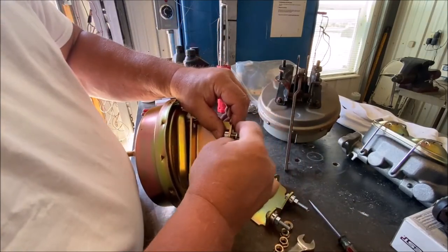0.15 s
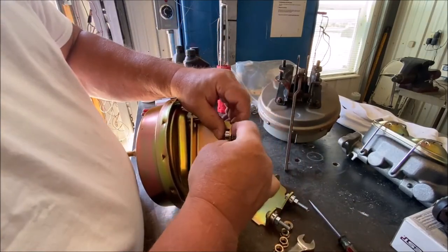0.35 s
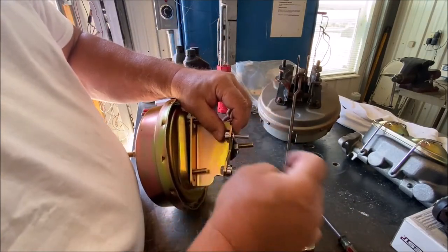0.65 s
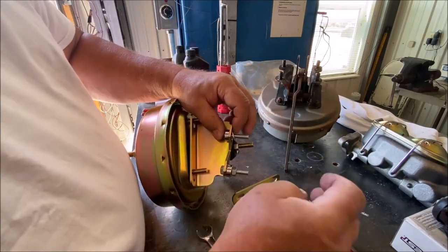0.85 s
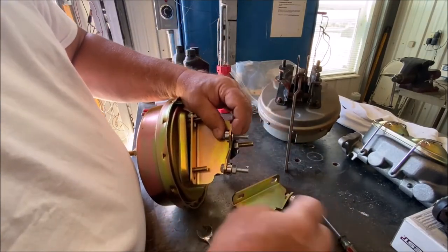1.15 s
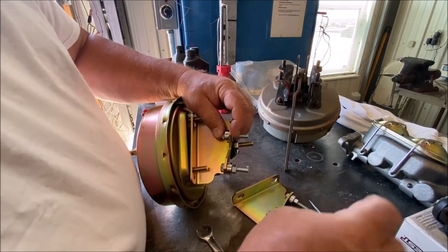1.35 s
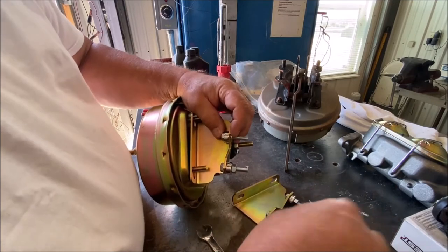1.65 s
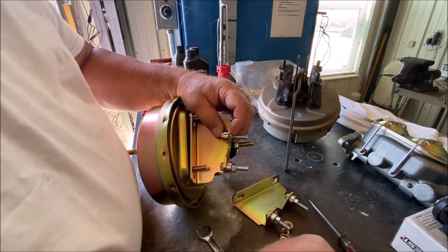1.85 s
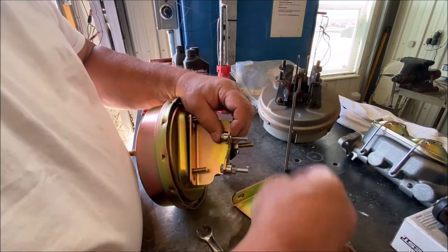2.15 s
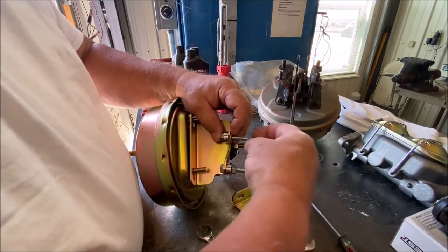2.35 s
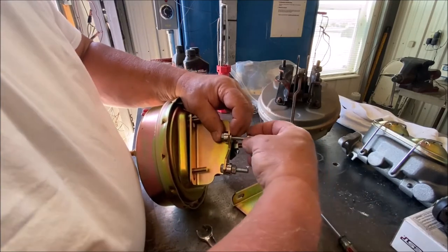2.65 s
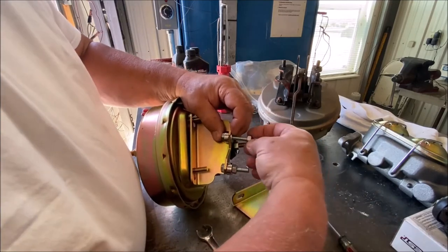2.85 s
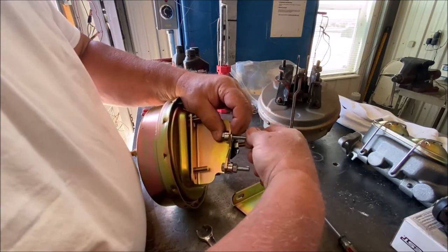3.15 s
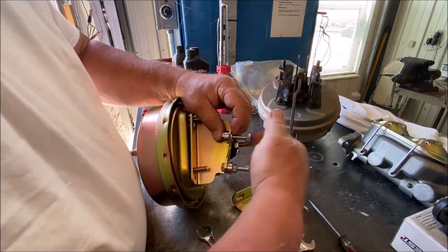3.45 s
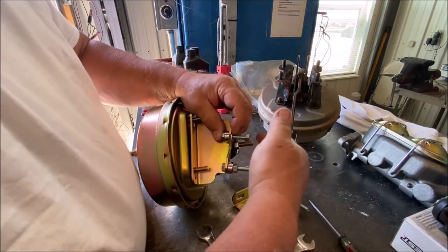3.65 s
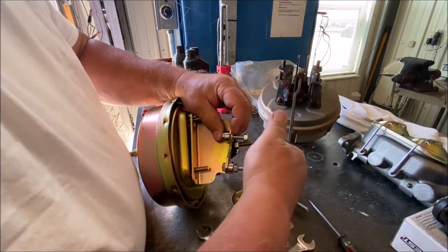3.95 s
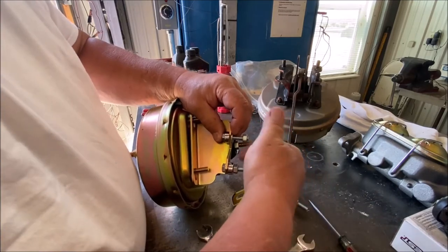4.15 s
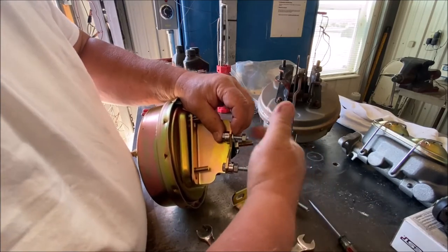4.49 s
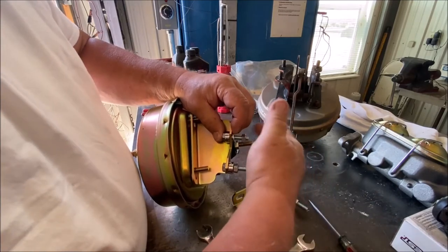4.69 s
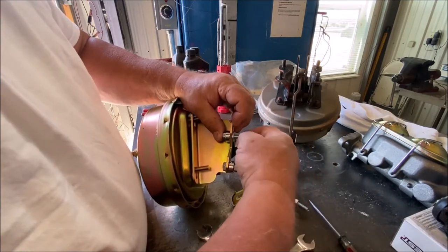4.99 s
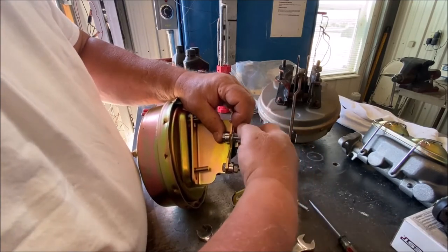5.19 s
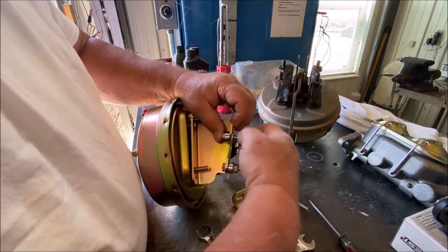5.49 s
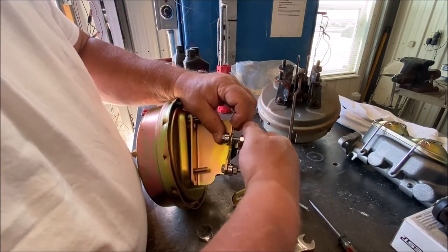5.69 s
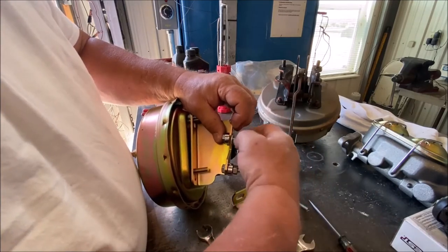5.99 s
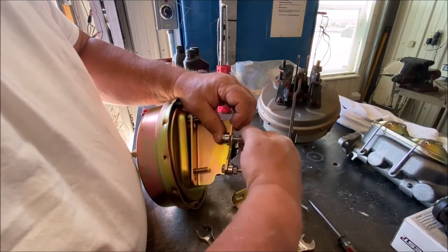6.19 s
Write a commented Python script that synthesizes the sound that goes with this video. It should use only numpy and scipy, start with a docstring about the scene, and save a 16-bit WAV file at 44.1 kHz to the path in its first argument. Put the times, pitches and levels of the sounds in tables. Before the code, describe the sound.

Light, irregular metal clicks and short thread scrapes, with a few soft bench thumps and a steady low hum.

```python
"""Fingers rustle and small steel spacers and nuts click as they are picked up and spun onto studs.
Each contact is a short crack that rings the parts; threads stick and slip; knuckles thump the bench.
A small workshop room answers, over mains hum, a slower motor's drone and low rumble."""
import sys
import numpy as np
from scipy import signal
from scipy.fft import rfft, irfft, next_fast_len
from scipy.io import wavfile
from scipy.ndimage import uniform_filter1d

SR = 44100
rng = np.random.default_rng(int(sys.argv[2]) if len(sys.argv) > 2 else 0)


def store_wav(level_fs):
    """Save 16-bit WAV to argv[1]."""
    pcm = np.round(np.clip(np.atleast_2d(level_fs), -1, 1) * 32767)
    wavfile.write(sys.argv[1], SR, pcm.T.astype(np.int16))


N = 279153
TIME_S = np.arange(N) / SR


def undb(db):
    """Decibels to gain."""
    return 10 ** (np.asarray(db) / 20)


def unit(x):
    """Scale to rms 1."""
    return x / np.sqrt(np.mean(x ** 2))


def pan(left_over_right_db):
    """Stereo gain column."""
    return undb([[left_over_right_db / 2], [-left_over_right_db / 2]])


def contour(table):
    """Gain over time from (time_s, level_db) points."""
    return undb(np.interp(TIME_S, *np.transpose(table)))


def on_log(hz, table):
    """Interpolate (freq_hz, value) points on a log axis."""
    at_hz, value = np.transpose(table)
    return np.interp(np.log(np.maximum(hz, 1)), np.log(np.maximum(at_hz, 1)), value)


def noise(table):
    """Noise coloured by (freq_hz, density_db) points."""
    size = next_fast_len(N)
    colour = undb(on_log(np.fft.rfftfreq(size, 1 / SR), table))
    return irfft(rfft(rng.standard_normal(size)) * colour, size)[:N]


def band(x, lo_hz, hi_hz, order=2):
    """Butterworth band-pass."""
    sos = signal.butter(order, [lo_hz, min(hi_hz, .45 * SR)], "band", fs=SR, output="sos")
    return signal.sosfilt(sos, x)


def walk(rate_hz):
    """Random steps, smoothed twice; spread near 1."""
    hold = int(SR / rate_hz)
    steps = np.repeat(rng.standard_normal(N // hold + 1), hold)
    return 1.4 * uniform_filter1d(uniform_filter1d(steps, hold), hold)[:N]


def ring(x, modes, wander_db=0.):
    """Damped modes driven by x; each drive wanders as the grip changes."""
    out = 0
    for hz, db, t60_s in modes:
        radius, angle = np.exp(-np.log(1000) / (t60_s * SR)), 2 * np.pi * hz / SR
        drive = x * undb(db + wander_db * walk(rate_hz=11))
        out = out + signal.lfilter([0, np.sin(angle)], [1, -2 * radius * np.cos(angle), radius ** 2], drive)
    return out


def blows(starts_s, levels_db, lengths_s):
    """Contact envelopes: fast swell, exponential decay."""
    out = np.zeros(N)
    for start_s, level_db, length_s in zip(starts_s, levels_db, lengths_s):
        i = int(max(start_s - .001, 0) * SR)
        t = np.arange(int(9 * length_s * SR)) / SR
        shape = (1 - np.exp(-t / (0.59 * length_s))) ** 3 * np.exp(-t / length_s)
        out[i:i + len(t)] += undb(level_db) * shape[:N - i] / shape.max()
    return out


# motor swell: time_s, level_db
DRONE_LEVEL = [(0.0, -58), (.35, -54.5), (.7, -55), (1.25, -52.5), (1.62, -53), (1.97, -67.5), (2.54, -57),
               (2.89, -57.5), (3.33, -58), (4.28, -68.5), (4.8, -62), (5.1, -73), (5.5, -56.5), (6.33, -87)]
# room air spectrum: freq_hz, density_db
AIR_SPECTRUM = [(12, -76), (20, -49), (30, -20), (49, -15.5), (67, -8), (86, -13.5), (131, -13.5),
                (147, -16.5), (165, -18.5), (281, -31), (361, -35.5), (416, -44), (506, -47.5),
                (15200, -61.5), (16500, -81)]
def shop_hum(mains_hz=118, mains_db=-58, motor_hz=84.6, air_db=-73):
    """Mains hum, a wavering motor drone and room air whose bass is alike on both sides."""
    mains = undb(mains_db + 2.6 * walk(7)) * np.sin(2 * np.pi * mains_hz * TIME_S + .3 * walk(5))
    motor_gain = contour(DRONE_LEVEL) * undb(2.4 * walk(7.1))
    motor = motor_gain * np.sin(2 * np.pi * motor_hz * TIME_S + 0.56 * walk(7.5))
    mid, side = noise(AIR_SPECTRUM), noise(AIR_SPECTRUM)
    side = .36 * side + .75 * band(side, 250, 18000)
    air_gain = undb(air_db + 1.6 * walk(3)) / np.std(band(mid, 229, 16000))
    air = air_gain * np.array([mid + side, mid - side])
    return (mains + motor + air) * pan(2.8)


# steel contact spectrum: freq_hz, density_db
GRIT_SPECTRUM = [(120, -44.5), (200, -9.5), (485, -15.5), (784, -6), (1320, -3.5), (1520, 4.5),
                 (2600, -0.5), (3020, -8.5), (4530, -0.5), (5060, 1.5), (9310, -9), (12100, -6.5),
                 (13200, -10.5), (15300, -6), (16500, -33)]
def contact_grit(edges_hz=(480, 1100, 2800, 6200, 10000, 16500)):
    """Contact noise in five bands; bench reflections give each side some of its own."""
    grit = noise(GRIT_SPECTRUM) + 1.42 * np.array([noise(GRIT_SPECTRUM), noise(GRIT_SPECTRUM)])
    body, *upper = (unit(band(grit, lo, hi, order=4)) for lo, hi in zip(edges_hz, edges_hz[1:]))
    housing_thud = 0.26 * unit(band(grit, 150, 470))
    return [body + housing_thud, *upper]


# finger friction: time_s, level_db
RUB_LEVEL = [(0, -61), (.17, -92), (.44, -78), (.63, -99.5), (.92, -91), (1.2, -81.5), (1.32, -77.5),
             (1.44, -106), (1.66, -79), (2.13, -97.5), (2.48, -90), (2.61, -80.5), (2.84, -100),
             (3.21, -85), (3.52, -107), (3.62, -64), (4.12, -85.5), (4.85, -91), (5.13, -88.5),
             (5.4, -74.5), (5.75, -74), (6.17, -85.5), (6.33, -72)]
def finger_rub(grit):
    """Fingers rub the parts throughout: a fluttering rustle."""
    body, knock, middle, treble, fizz = grit
    rustle = middle + undb(-4.5) * (body + knock) + undb(-17) * (treble + fizz)
    flutter = undb(1.7 * walk(130) + 0.78 * walk(21))
    return contour(RUB_LEVEL) * rustle * flutter


# steel contacts: time_s, level_db, weight_db, brightness_db, length_s
CONTACTS = [(0.0615, -41, -21, -5.5, 0.0049), (0.133, -41.5, -16.5, -1, 0.0016),
            (0.1496, -31.5, -34, -3.5, 0.0015), (0.161, -33, -23, -3, 0.0022),
            (0.1847, -42, -39, -2.5, 0.0032), (0.1982, -39.5, -43, 1.5, 0.0026),
            (0.262, -44.5, -12, 3, 0.0032), (0.2713, -32, -25, -1, 0.003), (0.4773, -51, -31, -6, 0.0035),
            (0.5008, -46, -20.5, -15, 0.0053), (0.5284, -37, -21, -3, 0.0036),
            (0.847, -77.5, -1, -25, 0.0029), (1.0056, -57.5, -31, 6, 0.0045),
            (1.0793, -74.5, 11, -9, 0.0038), (1.1023, -66, 1, -3.5, 0.0029),
            (1.4166, -58, -10, -11, 0.0031), (1.471, -62, 1, -22, 0.0082), (1.491, -50, -8.5, -4.5, 0.0042),
            (1.6335, -35, -19, 0, 0.0067), (1.6444, -32.5, -37, -8.5, 0.003),
            (2.1035, -49.5, -15.5, -4, 0.0044), (2.4399, -33, -25.5, -6.5, 0.0021),
            (2.549, -60, -3, -33, 0.0026), (2.577, -45.5, -16, -32, 0.0045),
            (2.594, -34.5, -25.5, -26, 0.0021), (2.606, -36.5, -28.5, -0.5, 0.0043),
            (2.639, -39, -28, -5.5, 0.004), (2.659, -60.5, 0, -19, 0.0046),
            (2.689, -49.5, -17, -21, 0.0019), (2.7175, -56.5, -11, -2, 0.0024),
            (2.7374, -58.5, -1.5, -28, 0.0042), (2.797, -66.5, -2, -28, 0.0025),
            (2.875, -73.5, 10.5, -21, 0.007), (2.901, -74, 3, -25, 0.0046),
            (2.9893, -51, -19, -8.5, 0.0033), (3.2304, -62, -10, -8, 0.0034),
            (3.277, -50, -11, -12, 0.0058), (3.3366, -51, -19, -9.5, 0.0043), (3.5168, -40, -24, 0, 0.0037),
            (3.5377, -38.5, -15.5, -6, 0.0022), (3.5474, -31, -23, -5, 0.0017),
            (3.5716, -35, -9.5, -37, 0.0054), (3.7516, -31, -32, -7.5, 0.0028),
            (3.7803, -32.5, -24, -10, 0.003), (3.7892, -34.5, -18, -5, 0.0034),
            (3.8003, -24.5, -18, -17, 0.0045), (3.9589, -35, -42, -5, 0.0027),
            (3.991, -31.5, -15.5, -5, 0.0018), (4.1706, -41.5, -39, -7.5, 0.0025),
            (4.1852, -41, -32, -12.5, 0.0086), (4.2444, -51, -15, -14, 0.006),
            (4.3934, -40, -43, -2, 0.0032), (4.4081, -35.5, -16.5, -6.5, 0.0037),
            (4.568, -49, -23, -1, 0.0032), (4.5892, -43, -12, -4, 0.0026),
            (4.7713, -38.5, -13.5, -2.5, 0.0026), (4.8012, -39.5, -18, -5.5, 0.0028),
            (4.909, -65, -22, 1, 0.0029), (5.003, -78.5, 17.5, -6, 0.0056), (5.0931, -40, -25, 4.5, 0.0036),
            (5.116, -49.5, -4, -15, 0.0073), (5.175, -54, -23, -16, 0.003),
            (5.1975, -51.5, -20, -17, 0.0027), (5.294, -50, -4, -32, 0.0034),
            (5.3085, -24, -8.5, -11, 0.0028), (5.3986, -50.5, -7, -5, 0.0053),
            (5.4173, -37, -20, -6, 0.0036), (5.559, -30, -8, -12.5, 0.0036),
            (5.7012, -34, -21, -10.5, 0.0043), (5.8542, -30.5, -20.5, -11, 0.0043),
            (6.0575, -34.5, -7, -15.5, 0.0027), (6.096, -42, -39, -4, 0.0055),
            (6.2927, -45, -13, -19, 0.0023), (6.3044, -35, -6, -13.5, 0.0031)]
def steel_clicks(grit):
    """Steel strikes steel in short cracks; the heavier body answers later and longer."""
    body, knock, middle, treble, fizz = grit
    time_s, level_db, weight_db, brightness_db, length_s = np.transpose(CONTACTS)
    start_s = time_s - 0.0008
    return (body * blows(start_s + 0.001, level_db + weight_db - 6, 1.56 * length_s)
            + knock * blows(start_s, level_db + 0.58 * weight_db - 4, length_s)
            + middle * blows(start_s, level_db - 9.5, 0.87 * length_s)
            + treble * blows(start_s, level_db + brightness_db - 6.5, 0.93 * length_s)
            + fizz * blows(start_s, level_db + 1.79 * brightness_db + 1.5, 0.78 * length_s))


# stud and housing modes: pitch_hz, level_db, t60_s
STUD_MODES = [(760, 2, 0.009), (1041, -10.5, 0.0076), (1530, -9, 0.01), (1878, -8.5, 0.016),
              (2200, -11, 0.013), (3430, -12, 0.015), (3850, -6, 0.013), (4590, -2, 0.01),
              (11700, -5, 0.013), (13060, -8, 0.008), (14770, -14, 0.007)]
def stud_ring(contact):
    """Contacts ring the studs and housing."""
    return ring(contact * undb(-27.5), STUD_MODES, wander_db=6.5)


# spacer modes: pitch_hz, level_db, t60_s
SPACER_MODES = [(4300, 0, .01), (5400, 0, .007), (7500, -3, .009), (8750, 1, .022)]
# spacer looseness: time_s, drive_db
SPACER_DRIVE = [(0, -37), (.6, -36.5), (1.0, -24), (1.35, -24.5), (1.7, -31.5), (2.0, -38), (5.8, -34.5)]
def spacer_ring(contact):
    """The spacer rings louder while loose, softer under the fingers and then the nut."""
    return ring(contact * contour(SPACER_DRIVE), SPACER_MODES, wander_db=6)


# nut turns and drags over the bench: start_s, length_s, level_db, body_offset_db
STROKES = [(0.118, 0.1, -48.5, -7.5), (0.237, 0.083, -50.5, -9), (0.529, 0.028, -53.5, -11.5),
           (0.852, 0.039, -74, -5.5), (1.134, 0.27, -75.5, -3), (1.398, 0.17, -73, 9),
           (1.617, 0.035, -59, -3.5), (1.887, 0.12, -73, 10), (2.437, 0.084, -67, 4),
           (2.558, 0.048, -71.5, 2.5), (3.138, 0.077, -77, 11), (3.226, 0.15, -66, -1),
           (3.508, 0.13, -49, -10), (3.759, 0.092, -49.5, -7), (3.948, 0.07, -51.5, -8.5),
           (4.159, 0.14, -55.5, -7), (4.363, 0.09, -59, -6), (4.552, 0.08, -50.5, -12.5),
           (4.772, 0.077, -58, -8), (5.082, 0.052, -49, -6.5), (5.279, 0.14, -62.5, -5),
           (5.549, 0.13, -57.5, -2), (5.863, 0.049, -52, -8.5), (6.084, 0.11, -51.5, -6.5)]
def thread_scrapes(grit, jerk_rate_hz=110, jerk_decay_s=0.00065):
    """Turning nuts and dragged parts stick and slip; each small jerk is a tick."""
    body, knock, middle, treble, fizz = grit
    low_gain, high_gain = np.zeros((2, N))
    for start_s, length_s, level_db, body_offset_db in STROKES:
        rise = np.clip((TIME_S - start_s) / (0.52 * length_s), 0, 1)
        fall = np.clip((start_s + length_s - TIME_S) / (0.88 * length_s), 0, 1)
        low_gain += undb(level_db + body_offset_db) * rise * fall
        high_gain += undb(level_db) * rise * fall
    jerks = (rng.random(N) < jerk_rate_hz / SR) * rng.exponential(1.5, N)
    ticks = signal.lfilter([1], [1, -np.exp(-1 / (jerk_decay_s * SR))], jerks)
    low = low_gain * (body + 0.9 * knock)
    high = high_gain * (middle + undb(-4.5) * (treble + fizz))
    return (low + high) * (0.95 + ticks) * undb(2 * walk(60))


# knocks on the bench: start_s, level_db
KNOCKS = [(3.569, -60), (3.812, -53.5), (4.735, -44.5), (5.128, -52), (5.306, -78), (5.44, -39),
          (5.56, -52), (5.713, -43.5), (6.057, -62.5)]
# bench top modes: pitch_hz, level_db, t60_s
BENCH_MODES = [(89.8, 9.5, 0.23), (120, 2, 0.051), (168, 12, 0.032), (252, -5.5, 0.1), (365, 11, 0.022),
               (606, -2, 0.025)]
def bench_thumps(contact_s=.007):
    """Knuckles and the heavy part ring the bench top, which radiates no deep bass."""
    start_s, level_db = np.transpose(KNOCKS)
    push = blows(start_s, level_db, np.full(len(start_s), contact_s)) * pan(5)
    roughness = 0.25 + 4 * band(rng.standard_normal(N), 77, 1400)
    return undb(-43.5) * band(ring(push * roughness, BENCH_MODES), 81, 3000)


# reverberation bands: freq_hz, t60_s, level_db
ROOM_BANDS = [(287.5, 0.32, -21.5), (870, 0.26, -33.5), (1890, 0.23, -18.5), (5350, 0.41, -20.5),
              (10000, 0.12, -19.5)]
def room(x, build_s=0.0039):
    """Small-room reflections as decaying noise bands, partly shared by the two sides."""
    t = np.arange(int(.5 * SR)) / SR
    tails = np.zeros((3, len(t)))
    for tail in tails:
        for hz, t60_s, db in ROOM_BANDS:
            wash = unit(band(rng.standard_normal(len(t)), hz / 1.37, hz * 1.746))
            tail += undb(db - 60 * t / t60_s) * wash / np.sqrt(t60_s * SR / 14)
    shared, own = tails[0], tails[1:]
    response = (1 - np.exp(-t / build_s)) * (shared + 0.81 * own)
    return signal.fftconvolve(x, response, axes=1)[:, :N]


# phase between ports: freq_hz, left_lead_rad
PORT_LEAD = [(0, -3), (690, 2.5), (1210, 4), (1890, 2.5), (3620, 1.5), (4910, 12), (5770, 8.5), (7750, 26),
             (8270, 24), (9220, 14), (10300, 11), (11700, 14.5), (15100, 8), (16200, 24.5)]
# balance between ports: freq_hz, left_tilt_db
PORT_TILT = [(60, -24), (110, 16.5), (200, -6.5), (380, 11.5), (700, 3.5), (1290, 5), (2380, 2),
             (4400, 7.5), (8120, -1.5), (15000, -2.5)]
def microphone_ports(x, tilt_offset_db=-3):
    """Two ports hear near sounds, each with its own phase and colour."""
    size = next_fast_len(N + 4096)
    hz = np.fft.rfftfreq(size, 1 / SR)
    lead_rad = np.interp(hz, *np.transpose(PORT_LEAD))
    tilt_db = on_log(hz, PORT_TILT) + tilt_offset_db
    left = undb(tilt_db / 2) * np.exp(.5j * lead_rad)
    return irfft(rfft(x, size) * np.array([left, 1 / left]), size)[:, :N]


def scene():
    """Hands work steel left of centre, heard through the ports; thumps and hum bypass them."""
    grit = contact_grit()
    friction = finger_rub(grit) + thread_scrapes(grit)
    contact = friction * pan(3.6) + steel_clicks(grit) * pan(4.5)
    steel = contact + stud_ring(contact) + spacer_ring(contact)
    thumps = bench_thumps()
    return shop_hum() + microphone_ports(steel + room(steel)) + thumps + room(thumps)


def record(dry):
    """Steep low-pass on the top treble."""
    cutoff_hz = 16300
    return signal.sosfilt(signal.ellip(8, .2, 70, cutoff_hz, fs=SR, output="sos"), dry)


dry = scene()
out = record(dry)
store_wav(out)
```